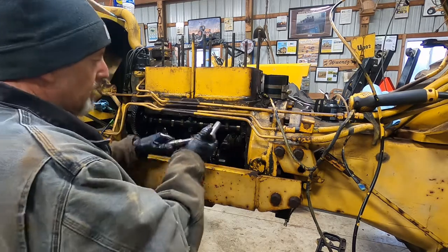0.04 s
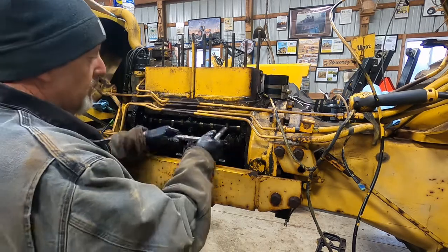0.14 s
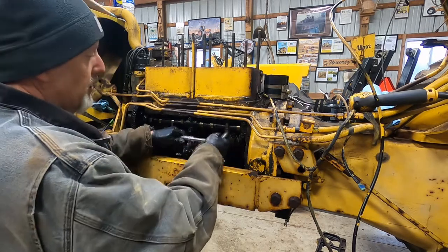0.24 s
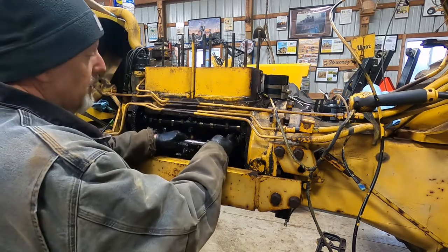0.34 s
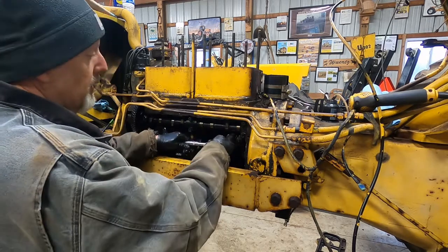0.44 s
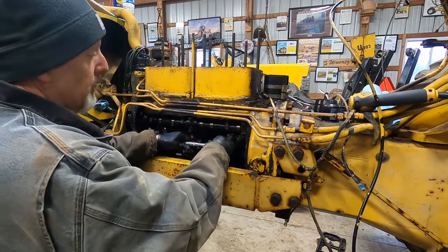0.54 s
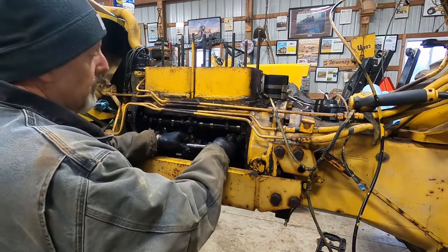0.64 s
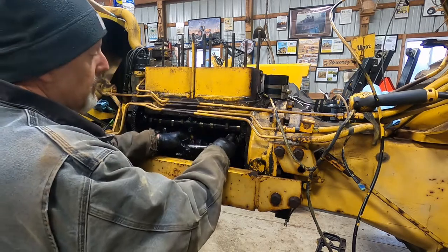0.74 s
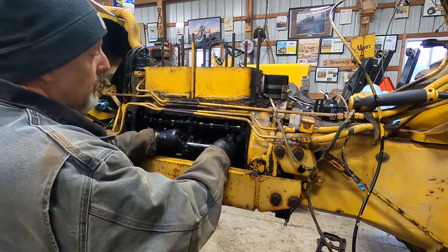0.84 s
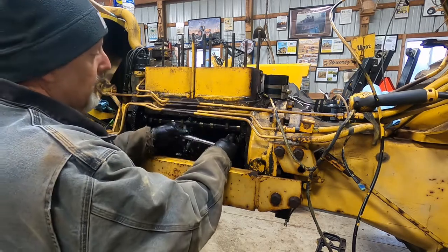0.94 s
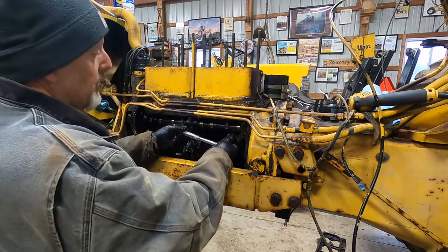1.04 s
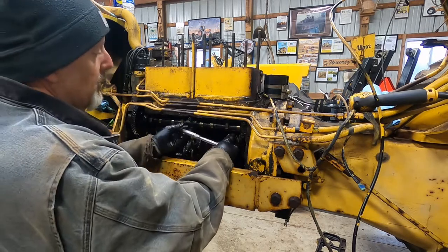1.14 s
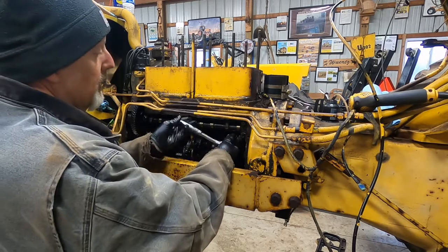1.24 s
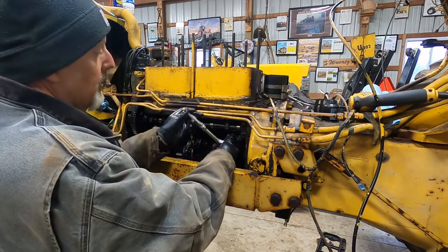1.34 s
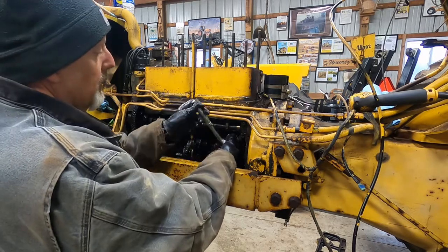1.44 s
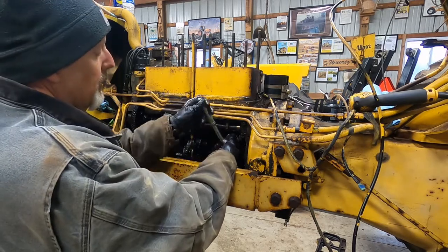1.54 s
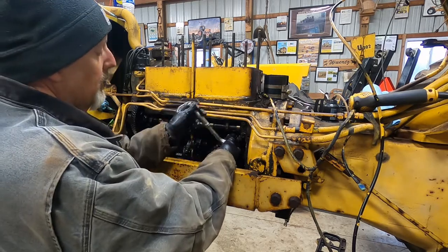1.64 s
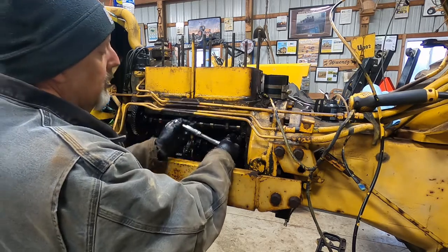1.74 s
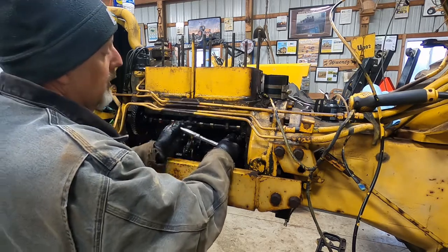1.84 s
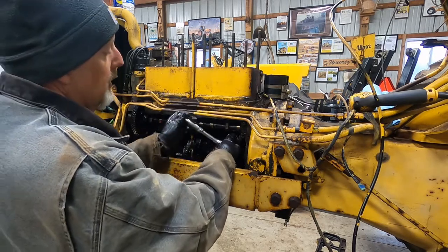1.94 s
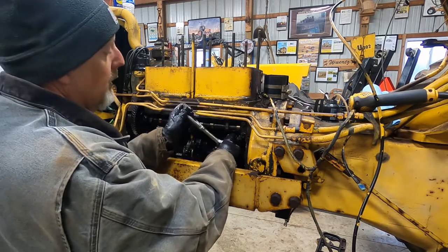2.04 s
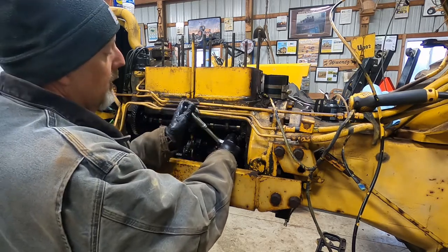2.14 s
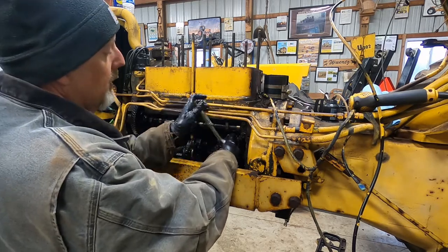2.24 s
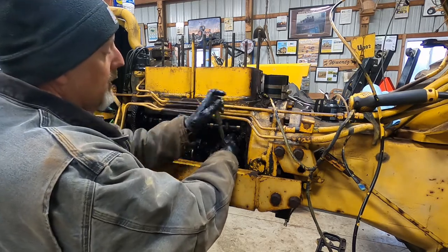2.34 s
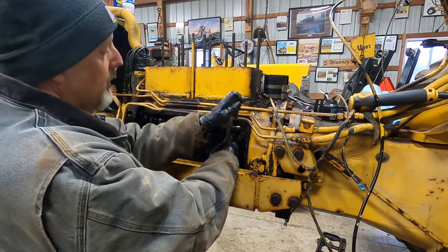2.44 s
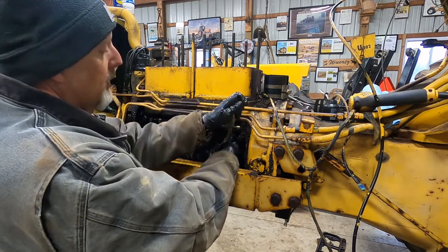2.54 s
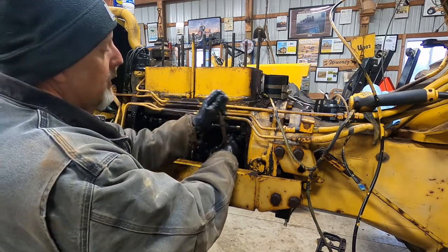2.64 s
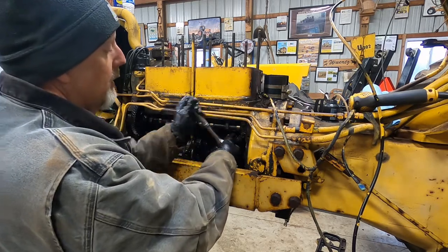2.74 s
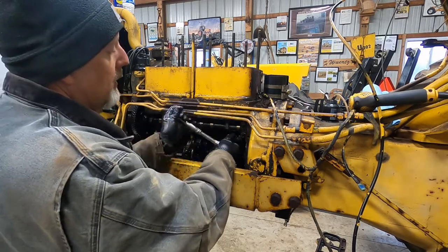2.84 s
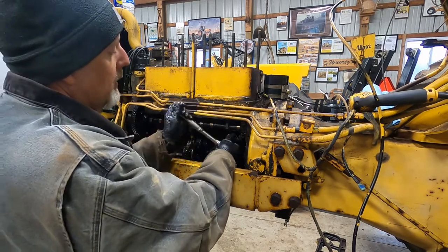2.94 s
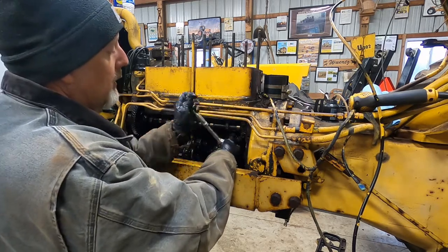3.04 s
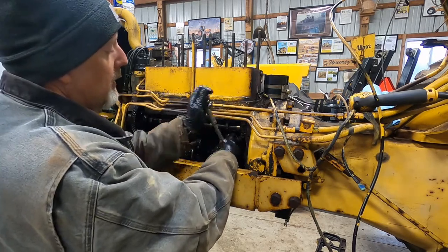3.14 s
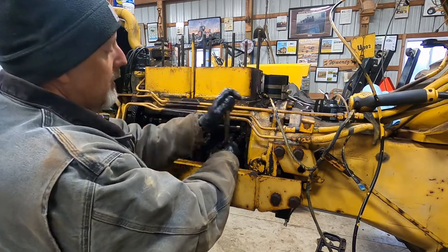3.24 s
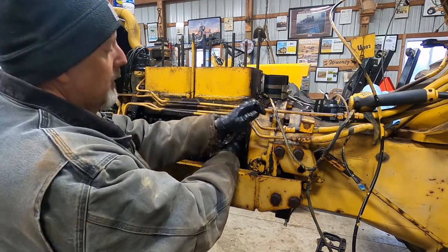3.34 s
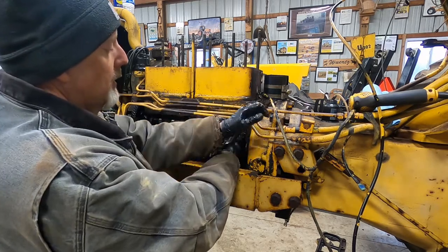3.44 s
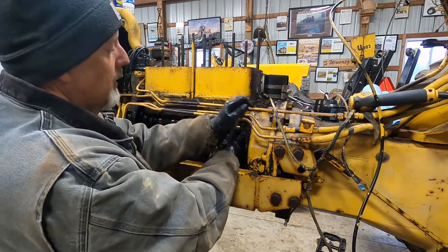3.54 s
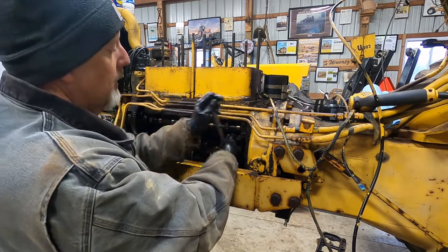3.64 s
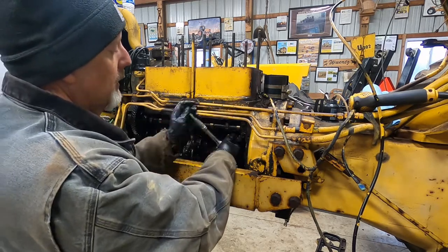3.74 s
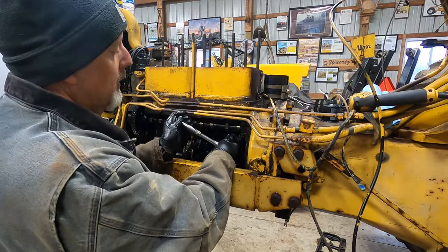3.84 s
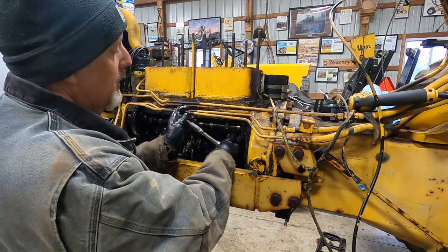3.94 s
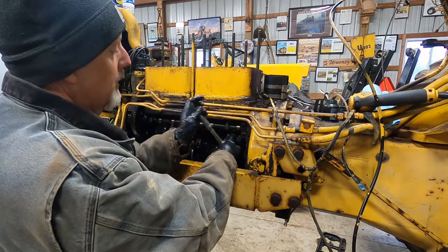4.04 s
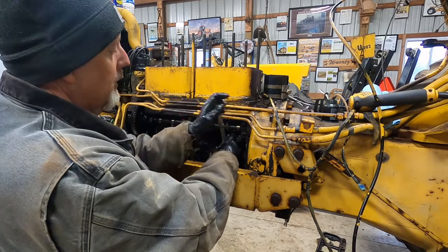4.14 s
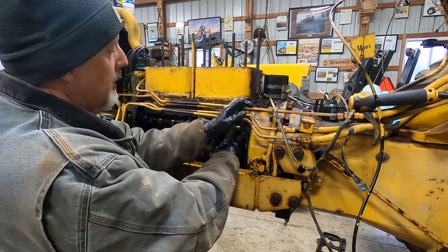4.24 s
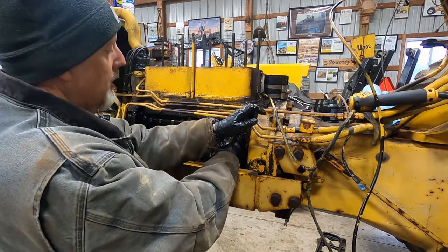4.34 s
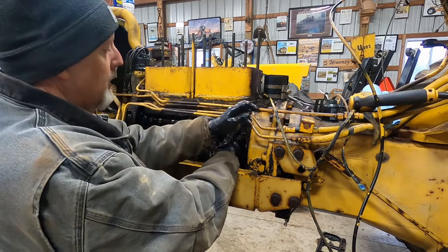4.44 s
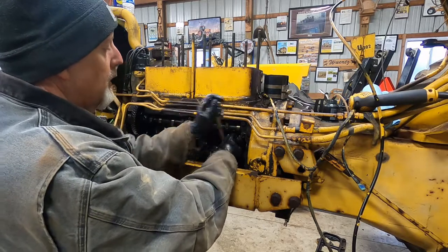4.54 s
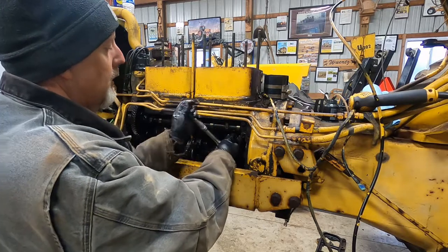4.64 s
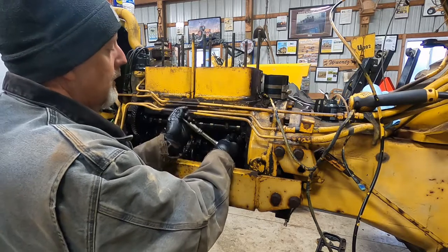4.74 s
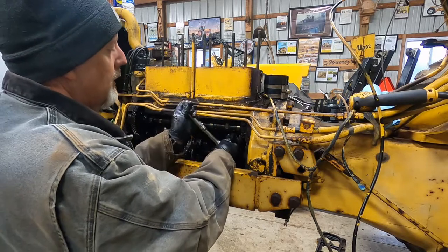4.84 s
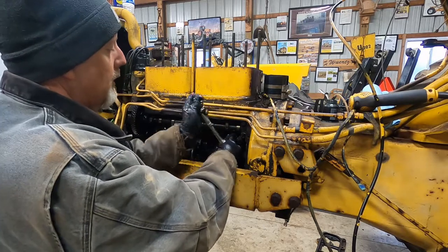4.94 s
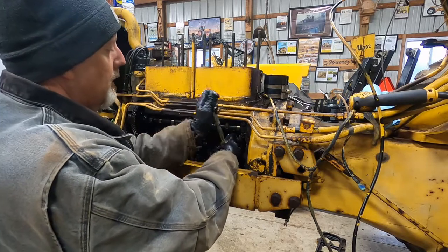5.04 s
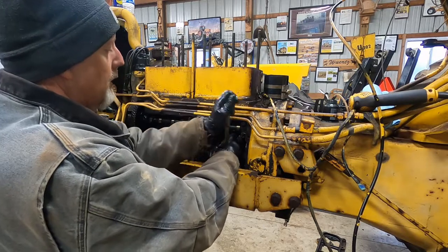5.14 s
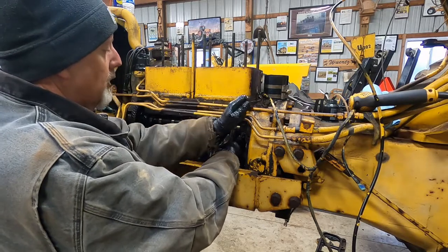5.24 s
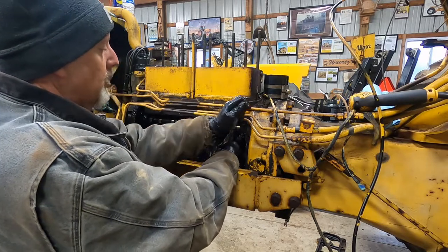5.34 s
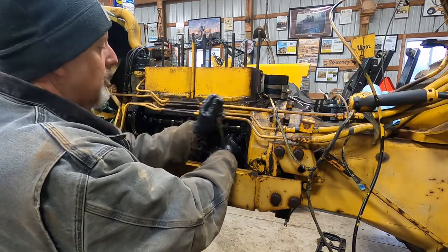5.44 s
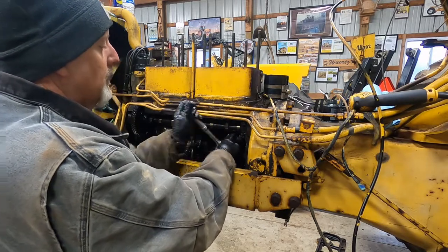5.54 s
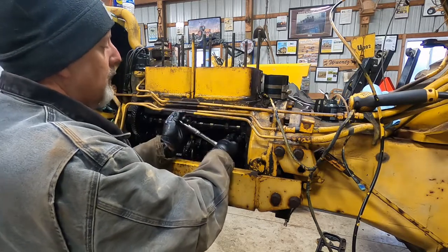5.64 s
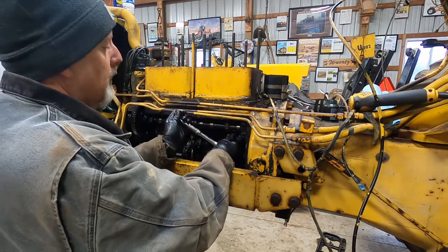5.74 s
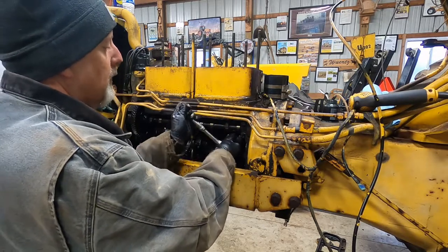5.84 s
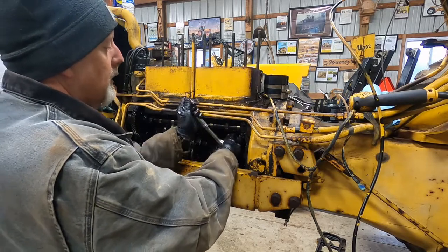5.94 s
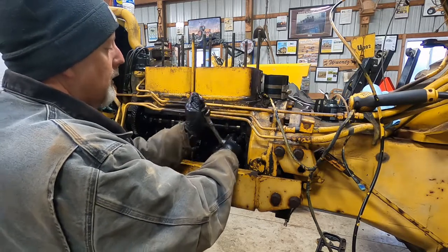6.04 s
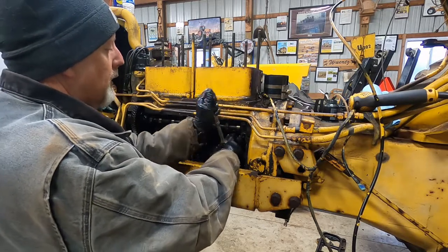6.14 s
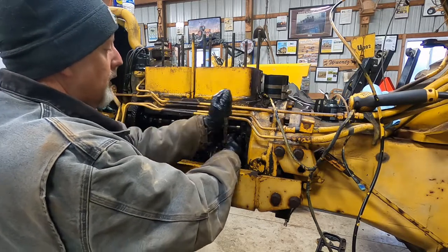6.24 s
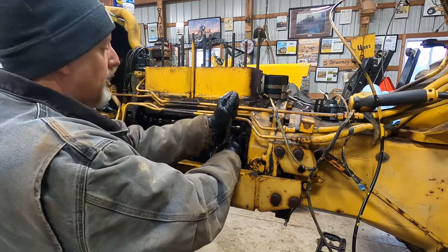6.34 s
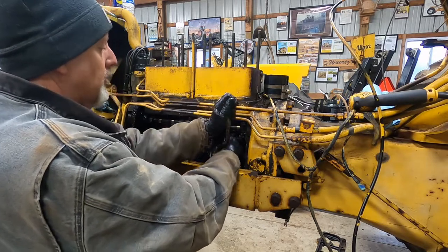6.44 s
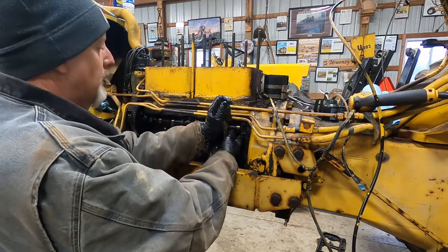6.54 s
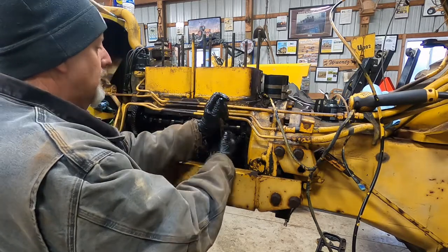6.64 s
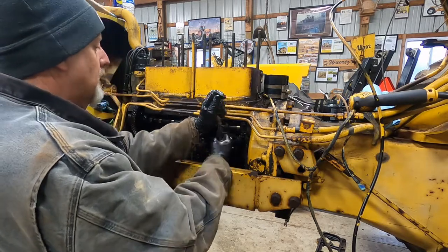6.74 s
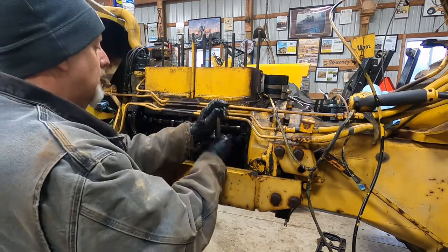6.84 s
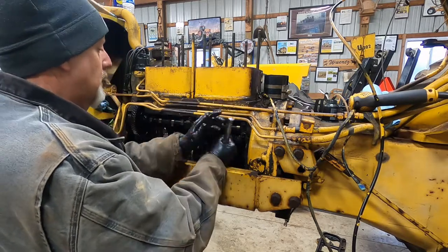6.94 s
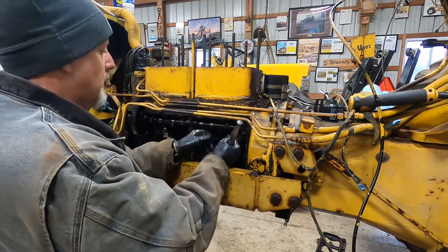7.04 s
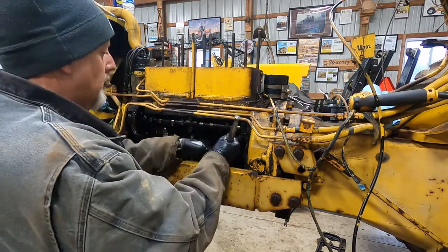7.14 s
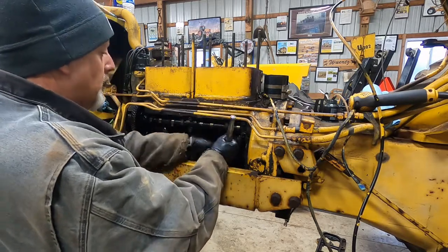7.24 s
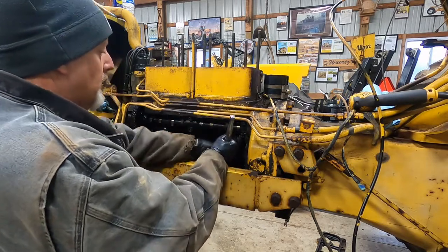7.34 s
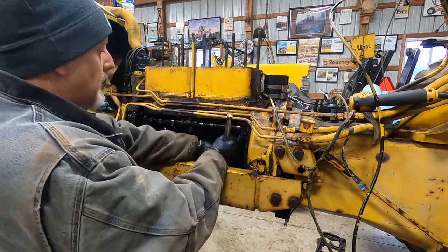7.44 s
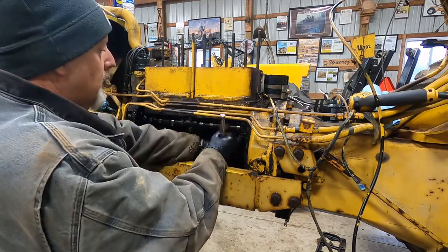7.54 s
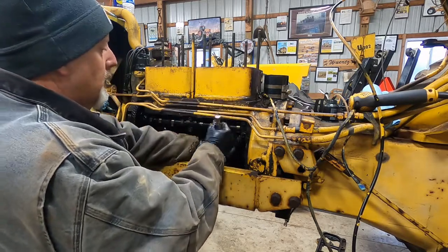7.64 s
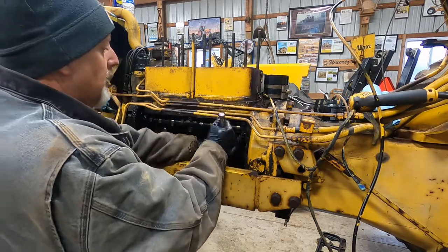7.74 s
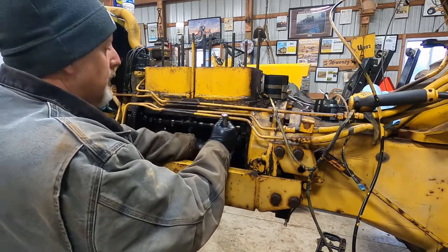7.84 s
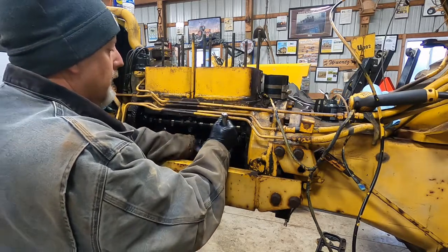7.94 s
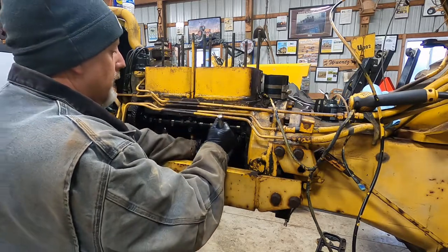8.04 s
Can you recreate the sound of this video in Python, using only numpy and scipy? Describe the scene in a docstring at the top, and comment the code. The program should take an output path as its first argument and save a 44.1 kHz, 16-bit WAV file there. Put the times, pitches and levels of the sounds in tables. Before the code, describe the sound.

A quiet sheet-metal workshop, heard in stereo from close by: faint room noise, a weak low hum that wavers and fades in and out, and soft jacket rustle throughout. From 0.1 to 1.8 s, a socket and handle make small, irregular metal taps on an engine, the clearest near 0.15, 0.6 and 0.9 s. At 1.85 s a hand ratchet swings back with a fast run of eight crisp clicks lasting about 0.2 s. Similar runs follow at 2.75, beginning with a hard snap, then 3.75, 4.7 and 5.6 s, with sleeve rustle and light dull knocks between. A firmer knock comes at 6.9 s. At 7.03 s the wrench strikes a steel rail: a loud, bright double clank, a weaker rebound at 7.08, and a ringing tail fading over roughly a second. Faint knocks follow at 7.5 and 7.7 s, and a sharper one at 8.1 s ends it.

```python
"""Bolts are tightened on an engine in a sheet-metal workshop.
Room noise (coloured noise), a wavering low hum (sine) and jacket rustle (level-curved noise) run from the start.
Socket and handle knock on the engine: noise bursts through resonances. From 1.8 s a hand ratchet swings back
five times, its pawl snapping over gear teeth: ticks that ring the tool, with shop echoes and more rustle.
At 7 s the wrench strikes a steel rail and rebounds: clusters of decaying modes."""
import sys
import numpy as np
from scipy import signal
from scipy.fft import rfft, irfft
from scipy.io import wavfile

SR = 44100
rng = np.random.default_rng(int(sys.argv[2]) if len(sys.argv) > 2 else 0)


def pcm_store(signal):
    """Save signal as 16-bit PCM."""
    levels = np.round(np.clip(np.atleast_2d(signal), -1, 1) * 32767)
    wavfile.write(sys.argv[1], SR, levels.astype(np.int16).T)


N = 357210

# pawl over a tooth, five back swings: [t/s, burst level/dB]
TOOTH_SNAPS = [(1.8443, -25.5), (1.873, -23.5), (1.9029, -25), (1.9435, -27), (2.7628, -15.5),
               (2.8281, -24), (2.8544, -26.5), (2.881, -33), (2.907, -30), (2.9382, -28), (2.9701, -24),
               (3.0127, -25), (3.7409, -22), (3.7716, -30.5), (3.8013, -23), (3.8248, -29), (3.8512, -28.5),
               (3.8777, -33.5), (3.9109, -25), (3.9409, -22.5), (3.9751, -25.5), (4.0328, -25.5),
               (4.6844, -28), (4.7069, -22.5), (4.7293, -23.5), (4.7523, -31.5), (4.7763, -23),
               (4.804, -24), (4.8366, -23.5), (4.8814, -27.5), (5.6075, -24.5), (5.6341, -25),
               (5.659, -23.5), (5.685, -32.5), (5.7131, -26), (5.7437, -24.5), (5.7773, -25),
               (5.8177, -25.5)]
# wrench on rail, blow and rebounds:
# [t/s, burst level/dB, dullness/dB, rattle t60/s, clunk f/Hz, clunk re burst/dB, push on rail/dB]
RAIL_BLOWS = [(7.034, -13.5, -13.5, 0.034, 2370, 0, -21), (7.0413, -16.5, 1, 0.037, 2520, -2, -47),
              (7.0817, -22.5, -7, 0.056, 1800, -4.5, -38.5)]
# left-right likeness of noise and cracks: [f/Hz, likeness/1]
CHANNEL_LIKENESS = [(60, 0.83), (150, 0.41), (380, 0.7), (950, 0.71), (2380, 0.61), (5980, 0.45),
                    (15000, 0.54)]


def from_db(db):
    """Gain of a level in dB."""
    return 10 ** (np.asarray(db) / 20)


def rms_one(x):
    """Scaled to rms 1."""
    return x / np.sqrt(np.mean(x ** 2) + 1e-20)


def in_time(rows):
    """A (t/s, value) curve at every sample."""
    t_s, values = np.transpose(rows)
    return np.interp(np.arange(N) / SR, t_s, values)


def at_hz(points, hz):
    """A (f/Hz, value) table read on a log-frequency axis."""
    table_hz, values = np.transpose(points)
    return np.interp(np.log(hz), np.log(table_hz), values)


def drift(corner_hz):
    """Slow random wander, spread 1: noise through a double pole, run at SR / 40."""
    step = 40
    pole = np.exp(-2 * np.pi * corner_hz * step / SR)
    noise = rng.standard_normal(N // step + 2002)
    slow = signal.lfilter([1], [1, -2 * pole, pole * pole], noise)[2000:]   # settled part
    return np.interp(np.arange(N) / step, np.arange(len(slow)), rms_one(slow))


def bands(x):
    """Yields centre Hz and content of each half-octave band; alternate signs let neighbours add up."""
    edges_hz = 22 * 2 ** np.arange(0, 9.6, .5)
    for k, (low, high) in enumerate(zip(edges_hz, edges_hz[1:])):
        sos = signal.butter(2, [low, high], "band", fs=SR, output="sos")
        yield np.sqrt(low * high), (-1) ** k * signal.sosfilt(sos, x)


def pair(mid, side, alike):
    """Two channels of a given likeness, from a common and an opposed part."""
    alike = np.clip(alike, -1, 1)
    return np.sqrt(1 + alike) * mid + np.sqrt(1 - alike) * side * [[1], [-1]]


def ring(x, hz, t60_s):
    """One decaying mode (two-pole resonator): a unit click rings with height 1."""
    r, w = from_db(-60 / (t60_s * SR)), 2 * np.pi * hz / SR
    return signal.lfilter([0, np.sin(w)], [1, -2 * r * np.cos(w), r * r], x)


def stereo_noise(spectrum, flicker_db):
    """Band-coloured noise that flickers in level; rms 1."""
    out = 0
    flicker = from_db(flicker_db * drift(4.44))
    for hz, (mid, side) in bands(rng.standard_normal((2, N))):
        out = out + from_db(at_hz(spectrum, hz)) * pair(mid, side, at_hz(CHANNEL_LIKENESS, hz))
    return rms_one(out * flicker)


def air():
    """Room noise: coloured noise with a flickering level."""
    # room noise colour: [f/Hz, band gain/dB]
    air_spectrum = [(12, -41), (20, -1), (48, -2.5), (74, 8.5), (93, -5), (119, 3.5), (326, -17.5),
                    (419, -22.5), (509, -2), (841, -46), (1240, -23), (4240, -45.5), (7620, -30.5),
                    (12300, -58), (15800, -72)]
    return from_db(-60) * stereo_noise(air_spectrum, flicker_db=3.5)


def hum():
    """A low tone of unsteady pitch; its level fades deeply, flickers and takes further random dips."""
    # hum level with its deep fades, before random flicker and further dips: [t/s, level/dB]
    hum_level = [(0.0, -63), (0.02, -54), (1.83, -47), (1.85, -52.5), (3.09, -50), (3.18, -68), (3.36, -51),
                 (3.92, -52), (3.99, -70.5), (4.56, -50.5), (4.65, -79), (4.76, -56.5), (5.53, -61),
                 (5.77, -47), (5.93, -77), (6.07, -51), (6.29, -49.5), (6.38, -88), (6.63, -50),
                 (7.15, -80), (7.24, -59), (7.58, -87), (7.96, -57), (8.1, -71)]
    centre_hz, waver_hz = 68.4, 1
    flicker_db, flicker_corner_hz = 2.0, 12
    steadiness, dips_corner_hz = 1.6, 3
    hz = centre_hz + waver_hz * drift(9.7)
    level = from_db(in_time(hum_level) + flicker_db * drift(flicker_corner_hz))
    dips = np.tanh(2 * (steadiness + drift(dips_corner_hz)))   # near 1, seldom crosses 0
    return np.sqrt(2) * level * dips * np.sin(2 * np.pi * np.cumsum(hz) / SR)


def cloth():
    """The jacket rustles with the arm: coloured noise under a level curve plus the back swings."""
    # rustle gain before the swings add: [t/s, level/dB]
    rustle_level = [(0, -57.5), (.3, -56.5), (.58, -68.5), (1.0, -66.5), (1.33, -59), (1.45, -70),
                    (1.72, -69), (2.1, -60), (2.3, -70), (2.5, -61), (2.72, -74), (3.3, -56.5),
                    (3.45, -68.5), (4.3, -61.5), (4.5, -74), (5.1, -60.5), (5.45, -72), (6.0, -63),
                    (6.33, -60), (6.5, -73), (6.9, -60), (7.3, -57), (7.7, -63), (8.1, -59.5)]
    # cloth noise colour: [f/Hz, band gain/dB]
    cloth_spectrum = [(180, -26), (300, -6.5), (372, -8), (852, -9), (1070, -0.5), (2270, -0.5), (4180, -5),
                      (7720, -12.5), (12900, -35), (15800, -37.5)]
    gain = from_db(in_time(rustle_level)) + swings()
    return gain * stereo_noise(cloth_spectrum, flicker_db=1.0)


def knock_blows():
    """Rows of engine and rail blows; dullness lifts the lows re mid and cuts the highs as much."""
    # socket and handle on engine; at 2.7636 s the low body of the loud first tooth snap:
    # [t/s, burst level/dB, dullness/dB, rattle t60/s, clunk f/Hz, clunk re burst/dB]
    low_knocks = [(0.1456, -37, -19.5, 0.014, 4360, 2.5), (0.5993, -42, 16, 0.084, 1860, -0.5),
                  (0.612, -46, 3, 0.065, 2130, 8), (0.757, -66, 6, 0.074, 1380, 14.5),
                  (0.7907, -45.5, 4, 0.059, 2060, -2), (0.8815, -37.5, -23.5, 0.031, 3670, 6.5),
                  (0.892, -58.5, -10, 0.076, 930, 10.5), (1.05, -57.5, -11, 0.084, 2120, 2),
                  (1.1479, -58, -12, 0.056, 1800, 7), (1.466, -70, -40.5, 0.15, 5830, 10.5),
                  (1.61, -81, -8, 0.12, 2560, 20), (1.6457, -75.5, -10, 0.043, 2540, 19),
                  (1.755, -60, -6, 0.089, 1500, -0.5), (1.808, -45.5, 5, 0.057, 3180, -2.5),
                  (2.0643, -47, -4, 0.13, 2960, -1.5), (2.0768, -56, -12, 0.11, 1750, 4),
                  (2.573, -63.5, -25, 0.16, 4430, -3), (2.75, -46, -5, 0.056, 3500, -6),
                  (2.7636, -32.5, 8, 0.035, 1306, 4.5), (3.1376, -45, 9, 0.046, 3680, 0),
                  (3.6215, -47.5, 10, 0.1, 1340, 0.5), (4.328, -53, 10, 0.071, 1170, 3),
                  (4.6098, -54.5, 17.5, 0.14, 1980, 7.5), (4.6503, -42, 7, 0.077, 3070, -3.5),
                  (4.9965, -45.5, 9, 0.044, 3700, 1), (5.563, -39.5, 6.5, 0.066, 2350, 0.5),
                  (5.577, -42.5, 1, 0.18, 1630, -3), (6.2793, -63, -7, 0.22, 1310, 5.5),
                  (6.569, -62.5, -26, 0.54, 3000, -3.5), (6.7, -56, -5, 0.15, 1210, 5.5),
                  (6.8192, -47, -5, 0.028, 1740, -2.5), (6.9057, -34, 5.5, 0.11, 1940, -2.5),
                  (7.5076, -53, -20, 0.06, 3030, -5), (7.719, -43, -17.5, 0.14, 1500, -3),
                  (8.0914, -28, 3, 0.1, 3070, -1)]
    high_db = -20.5   # highs re mid at zero dullness
    return [(s, db, dull_db, high_db - dull_db, t60_s, hz, clunk_db)
            for s, db, dull_db, t60_s, hz, clunk_db, *_ in low_knocks + RAIL_BLOWS]


def contacts(rows):
    """A tick, then loose parts rattle: a dying noise burst, lows and highs weighted per contact."""
    size = SR // 8
    rise_s = 0.00053   # loose parts join in over a moment
    t = np.arange(size) / SR
    layers = np.full((3, N + size), 1e-18)
    noises = rng.standard_normal((len(rows), size))
    for (s, db, low_db, high_db, t60_s), noise in zip(rows, noises):
        burst = noise * from_db(db - 60 * t / t60_s) * (1 - 0.54 * np.exp(-t / rise_s))
        at = round(s * SR)
        layers[:, at:at + size] += burst * from_db([[low_db], [0], [high_db]])
    low = signal.sosfilt(signal.butter(2, [500, 1500], "band", fs=SR, output="sos"), layers[0])
    mid = signal.sosfilt(signal.butter(2, [1500, 6000], "band", fs=SR, output="sos"), layers[1])
    high = signal.sosfilt(signal.butter(2, 6000, "high", fs=SR, output="sos"), layers[2])
    return (mid - low - high)[:N]


def crack(rows):
    """Broad crack of steel on steel; it comes off a wide engine, so the channels differ in part."""
    # metal contact colour: [f/Hz, band gain/dB]
    snap_spectrum = [(240, -60), (400, -41), (961, -3.5), (1230, 8.5), (1800, -9), (2530, -24.5),
                     (3600, 18.5), (5540, -7), (6760, 2), (10100, -7.5), (15800, -35)]
    out = 0
    both = np.array([contacts(rows), contacts(rows)])
    for hz, (mid, side) in bands(both):
        out = out + from_db(at_hz(snap_spectrum, hz)) * pair(mid, side, at_hz(CHANNEL_LIKENESS, hz))
    return from_db(-9.5) * out


def clunks(rows):
    """Each blow is answered by a broad resonance of its own, as of another part."""
    size = SR // 5
    t60_cycles = 4.5   # a casting rings only a few cycles
    t, out = np.arange(size) / SR, np.zeros(N + size)
    noises = rng.standard_normal((len(rows), size))
    for (s, db, _, _, t60_s, hz, clunk_db), noise in zip(rows, noises):
        once = ring(noise, hz, t60_cycles / hz)
        body = ring(once, hz, t60_cycles / hz)   # twice: steep flanks
        envelope = from_db(db + clunk_db - 60 * t / t60_s) * np.minimum(t * hz, 1)   # one-cycle rise
        out[round(s * SR):][:size] += envelope * rms_one(body)
    small = signal.butter(2, 600, "high", fs=SR, output="sos")   # hand-sized parts radiate little bass
    return signal.sosfilt(small, out[:N])


def shop(x):
    """Near echoes off engine and frame plus a dense wall tail, decaying per band, partly unlike per channel."""
    # wall tail decay: [f/Hz, t60/s]
    wall_decay = [(250, 1), (500, 1), (1300, 0.83), (3500, 0.33), (9000, 0.31), (15000, 0.23)]
    # left-right likeness of echoes: [f/Hz, likeness/1]
    echo_likeness = [(250, 0.41), (1000, 0.87), (4000, 0.78), (12000, 0.11)]
    near_db, near_t60_s = 8, 0.039   # re start of wall tail
    onset_s = 0.0011
    t = np.arange(SR) / SR
    echoes = 0
    near = from_db(near_db - 60 * t / near_t60_s)
    for hz, (mid, side) in bands(rng.standard_normal((2, SR))):
        tail = from_db(-60 * t / at_hz(wall_decay, hz))
        echoes = echoes + pair(mid, side, at_hz(echo_likeness, hz)) * (tail + near)
    echoes = echoes * np.clip(t / onset_s, 0, 1)
    echoes = echoes / np.sqrt(np.sum(echoes ** 2) / 2)   # mean channel energy 1
    return signal.fftconvolve(x[None], echoes, axes=1)[:, :N]


def teeth():
    """Contact rows of the pawl: a harder snap brings more lows, and no two teeth sound alike."""
    low_db, high_db, rattle_t60_s = -31, -9, 0.032   # re mid, before spread
    spread_db, t60_log_spread = 4, .25
    usual_db, low_db_per_db = -26, 1.63
    rows = []
    for (s, db), (a, b, c) in zip(TOOTH_SNAPS, rng.standard_normal((len(TOOTH_SNAPS), 3))):
        lows = low_db + low_db_per_db * (db - usual_db) + spread_db * a
        highs = high_db + spread_db * b
        rows.append((s, db, lows, highs, rattle_t60_s * np.exp(t60_log_spread * c)))
    return rows


def swings():
    """Extra sleeve rustle over each run of teeth, most in mid swing."""
    tail_s = 0.026
    tooth_s = np.array(TOOTH_SNAPS)[:, 0]
    t, out = np.arange(N) / SR, np.zeros(N)
    for run in np.split(tooth_s, np.flatnonzero(np.diff(tooth_s) > .3) + 1):
        progress = np.clip((t - run[0]) / (run[-1] + tail_s - run[0]), 0, 1)
        out += np.sin(np.pi * progress) ** 2
    return from_db(-54.5) * out


def wrench(rows):
    """Ratchet head rings briefly, handle rings on; every contact excites the modes differently."""
    # ratchet head modes, handle last: [f/Hz, relative level/dB, t60/s]
    tool_modes = [(2115, 1, 0.0027), (3120, 1, 0.005), (3592, -5, 0.0096), (4279, -5.5, 0.006),
                  (6700, -21, 0.14)]
    spread_db = 4
    rattle = contacts(rows)
    latest = np.searchsorted(np.sort(np.array(rows)[:, 0]), np.arange(N) / SR)   # contact now sounding
    grip = from_db(spread_db * rng.standard_normal((len(rows) + 1, len(tool_modes))))
    out = np.zeros(N)
    for k, (hz, db, t60_s) in enumerate(tool_modes):
        out += from_db(db) * ring(rattle * grip[latest, k], hz, t60_s)
    return from_db(-21) * out


def rail():
    """The blows shake the rail; each cluster of modes swells, beats at random and dies."""
    # steel rail, clusters of close modes: [f/Hz, relative level/dB, t60/s, cluster width/Hz]
    rail_modes = [(172, -7.5, 0.5, 1.1), (224, -10, 0.97, 3.4), (246.6, -6, 0.86, 0.75),
                  (256, -8.5, 1.86, 0.79), (307, -17, 1.25, 14), (403.2, -10, 0.76, 2.7),
                  (520, -16.5, 1.03, 60), (627, -26, 0.099, 11), (716, -2, 0.62, 22), (925, -9.5, 0.73, 30),
                  (1246, -31, 0.29, 43), (1333, -33, 0.31, 89), (1735, -3, 0.55, 39), (1866, -20, 1.14, 47),
                  (2350, -17, 1.32, 160), (2600, -11, 0.75, 25), (2550, -12, 0.74, 50),
                  (3050, -19.5, 0.81, 54), (3380, -13, .45, 75), (3680, -16, 0.49, 170),
                  (4730, -16.5, 0.5, 240), (6050, -6.5, 0.39, 160), (14620, -53, .3, 60)]
    swell_at_500hz_s = 0.0035   # the long rail takes a moment to ring up
    beat_depth = .3   # 0 steady ring, 1 deep random beats
    start = round(RAIL_BLOWS[0][0] * SR)
    out, t = np.zeros(N), np.arange(start, N) / SR
    since = [(np.maximum(t - row[0], 0), row[-1]) for row in RAIL_BLOWS]
    for hz, db, t60_s, width_hz in rail_modes:
        narrow = ring(rng.standard_normal(2 ** 16), hz, np.log(1000) / np.pi / width_hz)
        beats = np.abs(signal.hilbert(narrow))
        narrow = (narrow / beats ** (1 - beat_depth))[-len(t):]
        swell_s = swell_at_500hz_s * 500 / hz   # high rings start sooner
        shake = 0
        for age_s, push_db in since:
            shake = shake + from_db(push_db + db - 60 * age_s / t60_s) * (1 - np.exp(-age_s / swell_s))
        out[start:] += shake * rms_one(narrow)
    return from_db(-7) * out


def scene():
    """Tool with shop echoes, rail, cloth, room noise and hum, summed."""
    blows = knock_blows()
    clicks = teeth()
    tool = crack(clicks + [row[:5] for row in blows]) + wrench(clicks) + clunks(blows)
    echoes = from_db(-5) * shop(tool[0])
    thin = signal.butter(6, 128, "high", fs=SR, output="sos")   # steel parts move no deep bass
    steel = signal.sosfilt(thin, tool + echoes + rail())
    return steel + cloth() + air() + hum()


def record(dry):
    """Left and right differ in level and phase by frequency; the top is cut."""
    # channel balance: [f/Hz, left over right/dB]
    tilt = [(60, 1), (150, -0.5), (380, -1.5), (950, -0.5), (2380, 2), (5980, -0.5), (15000, -4)]
    # left phase over right: [f/Hz, lead/rad]
    left_lead = [(0, 0), (690, -0.4), (1030, -0.4), (3360, -0.9), (6720, -0.6), (7150, -0.2), (8350, -0.3),
                 (15500, 0.1)]
    hz = np.maximum(np.arange(N // 2 + 1) * SR / N, 1)
    lean = from_db(at_hz(tilt, hz) / 2) * np.exp(.5j * at_hz(left_lead, np.maximum(hz, 1)))   # half per channel
    left = irfft(rfft(dry[0]) * lean, N)
    right = irfft(rfft(dry[1]) / lean, N)
    top_cut = signal.cheby2(12, 70, 16450, fs=SR, output="sos")   # 70 dB down from 16450 Hz up
    return signal.sosfilt(top_cut, np.array([left, right]))


dry = scene()
out = record(dry)
pcm_store(out)
```